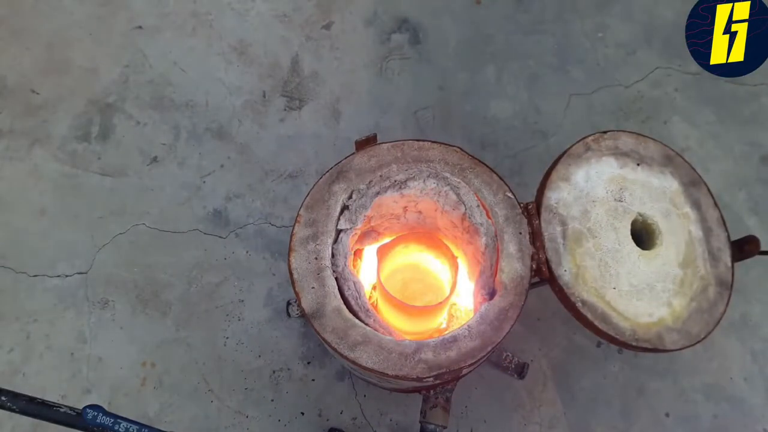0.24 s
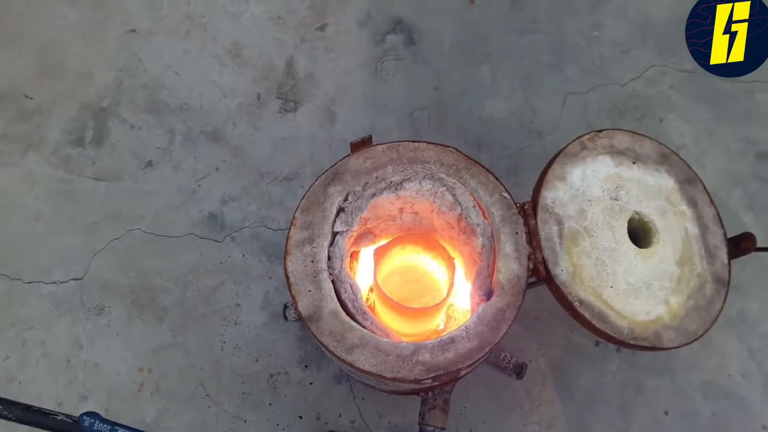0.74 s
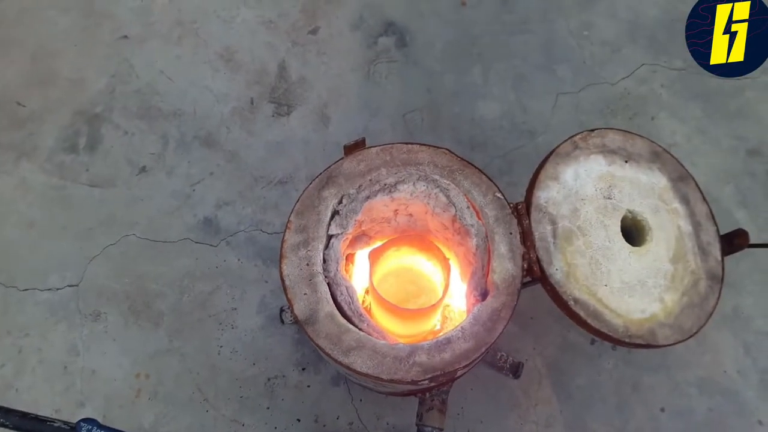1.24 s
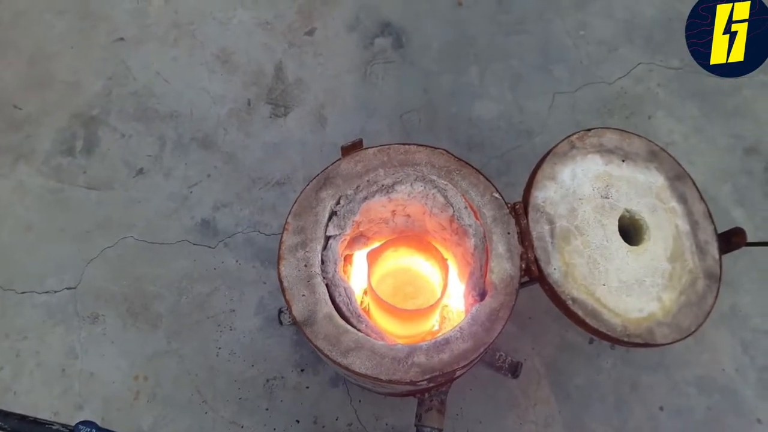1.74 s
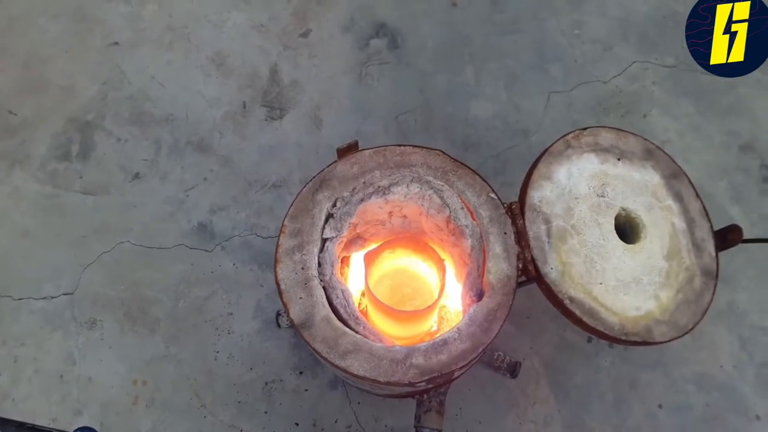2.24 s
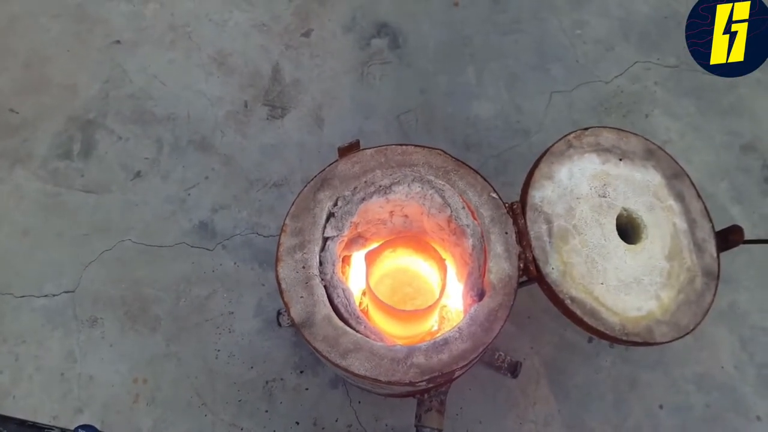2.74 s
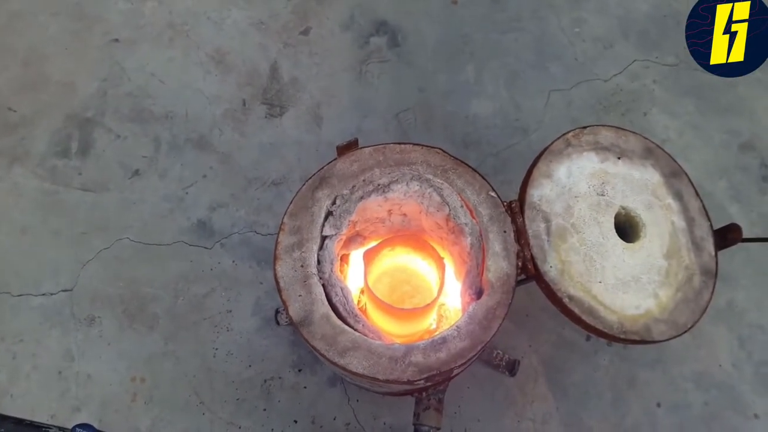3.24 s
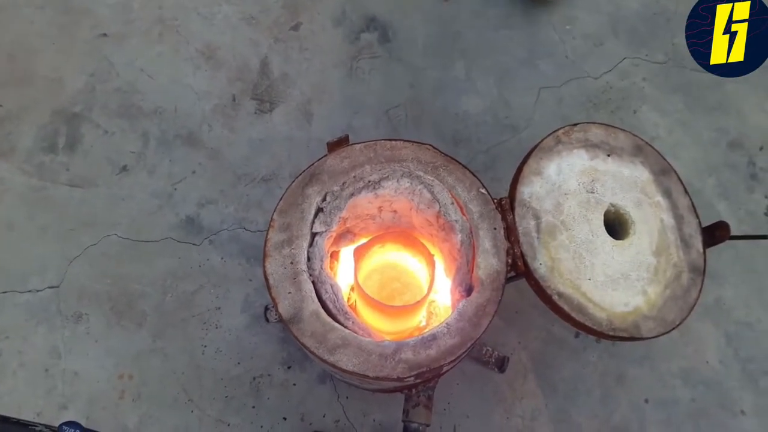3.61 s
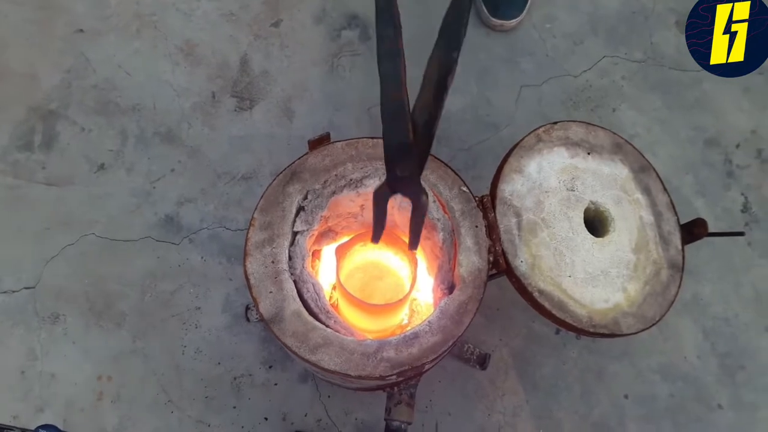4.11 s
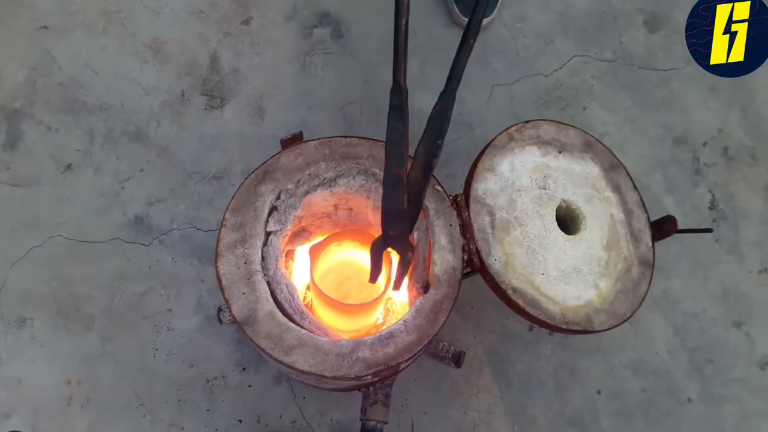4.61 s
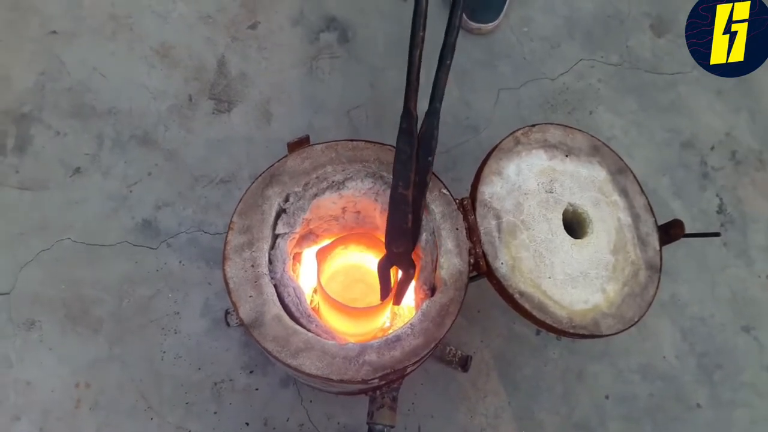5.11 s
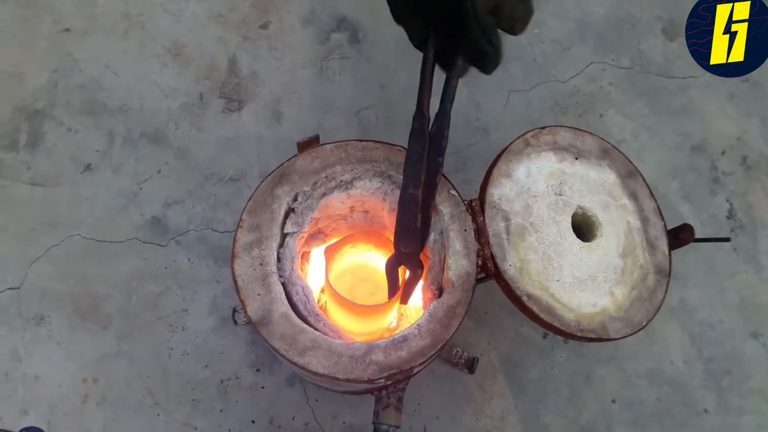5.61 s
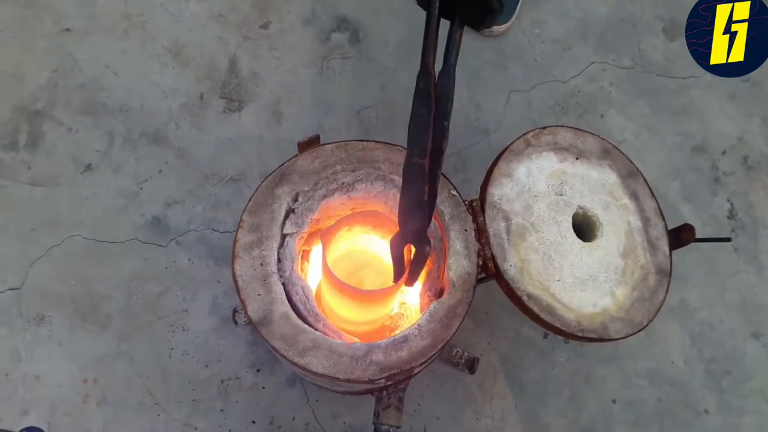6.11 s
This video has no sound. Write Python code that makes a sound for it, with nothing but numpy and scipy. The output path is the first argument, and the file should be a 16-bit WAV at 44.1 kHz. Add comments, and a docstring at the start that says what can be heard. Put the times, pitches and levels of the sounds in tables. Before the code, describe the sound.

A small open furnace burns at full heat on a workshop floor. Its hollow, throaty roar fills the whole stretch, fluttering rapidly with short surges and dips. A weaker, higher resonance wavers above it, with soft low rumbling puffs below. Behind it are a steady blower hum, faint whine and airy hiss. One microphone above, with slight short room reflections.

```python
"""A turbulent flame roars throughout, in the two lowest resonances of a small open furnace, over a rumble.
The furnace burns at full heat on a workshop floor, heard from above at one microphone.
Roar and rumble are shaped noise that flutters in level; the upper resonance also drifts in pitch.
Behind them the blower hums and whines in thin tones, and its draught hisses as patchy noise
with reflections of the workshop; a few faint, brief whistles glide upward."""
import sys
import numpy as np
from scipy import signal
from scipy.fft import rfft, irfft
from scipy.io import wavfile
from scipy.ndimage import uniform_filter1d

SR = 44100
rng = np.random.default_rng(int(sys.argv[2]) if len(sys.argv) > 2 else 0)


def transcribe(signal):
    """Save signal, clipped to [-1, 1], as a 16-bit WAV file at the path in sys.argv[1]."""
    frames = np.atleast_2d(signal).T
    limited = np.clip(frames, -1, 1)
    pcm = np.round(limited * 32767).astype(np.int16)
    wavfile.write(sys.argv[1], SR, pcm)


N = 280079
T = np.arange(N) / SR  # seconds
HZ = np.fft.rfftfreq(N, 1 / SR)

# Spectra give relative density only; each noise is later scaled to its own level.
# spectrum of the rush in the inlet pipe: pitch_hz, density_db [Hz, dB per Hz]
RUSH_SPECTRUM = [(600, -32), (1200, 0), (1480, -1.5), (1750, 0.5), (2100, 0), (2430, -2), (2790, 0),
                 (3150, -5), (3700, -4), (5000, -55)]
# spectrum of the hiss at the furnace mouth: pitch_hz, density_db [Hz, dB per Hz]
HISS_SPECTRUM = [(2000, -31), (3000, -37), (3550, -7), (4000, 2), (4600, 3), (5200, 0.5), (5700, 4),
                 (6400, 5), (7100, 3), (7500, -1.5), (7850, -11.5), (9000, -45)]
# spectrum of the higher fizz at the furnace mouth: pitch_hz, density_db [Hz, dB per Hz]
FIZZ_SPECTRUM = [(5000, -30), (8000, -6), (8700, -2), (9400, 0), (10500, -1), (11700, 1.5), (12500, 0),
                 (13100, 0), (14000, -1.5), (15500, -1)]
# strength of the rush before flicker and reflections: time_s, level_db [s, dB]
RUSH_LEVEL = [(0, -55), (.13, -63), (.3, -53.5), (.7, -57), (1.2, -54.5), (2.3, -56), (2.6, -58),
              (3, -54.5), (4.55, -57.5), (5.25, -56.5), (5.8, -58.5), (6.35, -57.5)]
# strength of the hiss before flicker and reflections: time_s, level_db [s, dB]
HISS_LEVEL = [(0, -58), (.2, -59), (.32, -56.5), (.45, -59), (1.2, -57.5), (2.25, -57), (2.55, -58.5),
              (2.9, -55.5), (3.45, -57), (4.4, -56.5), (4.57, -61.5), (4.76, -55.5), (5.48, -58.5),
              (5.7, -57), (6.22, -59.5), (6.35, -58)]
# brief whistles in the draught: middle_s, pitch_hz, peak_level_db, half_length_s [s, Hz, dB, s]
WHISTLES = [(0.316, 6600, -57.5, 0.049), (.29, 3200, -61, .1), (.3, 4100, -61, .07),
            (0.335, 1970, -57, 0.21), (1.353, 3590, -59.5, 0.17), (1.894, 7300, -63, 0.082),
            (2.303, 1780, -54, 0.082), (2.729, 4840, -57, .12), (4.219, 3580, -59, 0.11),
            (4.9, 1906, -56.5, 0.18)]
# a rough hiss that climbs: time_s, pitch_hz, level_db [s, Hz, dB]
CLIMB = [(0, 2740, -58), (.11, 2820, -52.5), (.17, 3200, -57), (.3, 3840, -63), (.42, 4100, -75)]
# the blower's blade tone and its multiples: multiple, level_db [-, dB before the blower's swell]
BLADE_ORDERS = [(1, -43.5), (3, -60.5), (6, -74), (10, -67), (11, -73), (20, -81), (30, -96)]
# thin tones of motor and housing: pitch_hz, level_db [Hz, dB before the blower's swell]
WHINE_TONES = [(134, -70), (1039, -60), (1387, -84), (1441, -76), (2780, -68), (2798, -67.5), (3278, -78.5),
               (3817, -78), (4160, -69), (4758, -77), (4856, -80), (6659, -79), (6826, -78), (7091, -75.5)]
# slow swell of the blower: time_s, swell_db [s, dB; halved for the tones, doubled for the ring]
BLOWER_SWELL = [(0, 1), (2.3, 2), (3.2, -2.5), (4.3, -1.5), (5, -5), (6.35, -2)]
# spectrum of the flame's rumble: pitch_hz, density_db [Hz, dB per Hz]
RUMBLE_SPECTRUM = [(20, -29), (48, -28), (65, -14), (85, -8), (105, -2), (135, -0.5), (200, 4), (300, -7.5),
                   (700, -11), (2000, -54)]
# spectrum of the main chamber resonance: pitch_hz, density_db [Hz, dB per Hz]
ROAR_SPECTRUM = [(150, -58), (215, -35), (250, -25.5), (280, -17.5), (322, -15.5), (336, -5.5), (385, -3),
                 (428, 1), (505, -4.5), (570, -10.5), (640, -23.5), (740, -33.5), (900, -36), (1300, -59)]
# spectrum of the upper resonance: offset_hz from its moving centre, density_db [Hz, dB per Hz]
UPPER_SPECTRUM = [(-500, -4), (-320, -8), (-200, -1), (-100, 1), (6, 6), (61, 6.5), (182, -1.5),
                  (249, -7.5), (379, -26.5), (598, -56)]
# drift of the upper resonance: time_s, centre_hz, level_db [s, Hz, dB]
UPPER_DRIFT = [(0, 1002, -43.5), (.45, 1084, -45), (1.2, 1059, -44), (1.55, 975, -44.5), (1.75, 1027, -45),
               (2.63, 1056, -43), (2.74, 1028, -53), (2.87, 1020, -41), (3.35, 987, -45),
               (3.85, 1040, -39.5), (4.5, 1068, -46.5), (4.6, 1086, -46), (5.42, 1009, -44.5),
               (5.75, 1084, -41.5), (5.84, 985, -51.5), (6.02, 975, -42.5), (6.17, 855, -57),
               (6.35, 820, -40)]
# the flame flares up (+) or falters (-): middle_s, roar_change_db, length_s [s, dB, s at half height]
SURGES = [(.37, -3.5, 0.064), (.76, 2, 0.11), (1.11, 3.5, 0.039), (1.54, -1, 0.11), (1.68, 2, 0.048),
          (1.77, -4.5, 0.067), (2.27, 1.5, 0.14), (2.43, -4.5, 0.1), (2.7, 3.5, 0.16), (2.84, -5, 0.082),
          (2.99, 4, 0.057), (3.2, 5, 0.044), (3.37, -2.5, 0.15), (3.83, -4, 0.064), (3.98, 3.5, 0.08),
          (4.85, -3.5, 0.074), (5.45, 3, 0.13), (5.63, 2.5, .06), (5.94, -3.5, 0.12)]
# the upper resonance flares: middle_s, rise_db, length_s [s, dB, s at half height]
FLARES = [(.44, 5, 0.13), (.67, 4.5, 0.092), (1.18, 5, 0.11), (1.55, 6, .08), (2.38, 2.5, .12),
          (4.61, 5, 0.079), (5.24, 3.5, 0.17)]
# low puffs of the flame: middle_s, rumble_rise_db, length_s [s, dB, s at half height]
PUFFS = [(.65, 8.5, .14), (1.42, 7, .08), (1.53, 12.5, .1), (1.92, 9, 0.078), (2.08, 8, 0.11),
         (3.0, 11, 0.13), (3.57, 7, .08)]

BLADE_HZ = 267.95
EDGE_HZ = 15560  # upper limit of the recorder
ROAR_DB, RUMBLE_DB = -25.5, -59.5  # between the surges and puffs
# turbulent flutter of each part: rms depth (dB) and rate (Hz)
ROAR_FLUTTER_DB, ROAR_FLUTTER_HZ = 0.76, 11
UPPER_FLUTTER_DB, UPPER_FLUTTER_HZ = 1.5, 11.6
RUMBLE_FLUTTER_DB, RUMBLE_FLUTTER_HZ = 1.7, 9.1
UPPER_SWAY_HZ, UPPER_SWAY_RATE_HZ = 11, 4  # sway of the upper resonance about its centre
FIZZ_DB, FIZZ_FOLLOW = -7, 1.06  # mean level relative to the hiss, and how far it follows its swings
WHISTLE_RISE_HZ_PER_S = 1220
# chance whistles: range of pitch, peak level, half length
FAINT_LOW_HZ, FAINT_HIGH_HZ, FAINT_DB, FAINT_HALF_S = 3400, 7900, -66, .11


def gain_of(db):
    """Decibels to amplitude."""
    return 10 ** (np.asarray(db) / 20)


def evened(x):
    """Scales to an rms of 1."""
    return x / np.sqrt(np.mean(abs(x) ** 2) + 1e-20)


def curves(rows):
    """Each column of a timed table, sample by sample."""
    s, *columns = np.transpose(rows)
    return [np.interp(T, s, c) for c in columns]


def swells(rows):
    """Smooth bumps in dB, each of its length at half height."""
    total_db = 0
    for middle_s, db, length_s in rows:
        phase = np.clip((T - middle_s) / length_s, -1, 1)
        total_db = total_db + db * np.cos(np.pi / 2 * phase) ** 2
    return total_db


def noise(spectrum):
    """Noise of rms 1 with the given spectrum, interpolated over log frequency."""
    hz, db = np.transpose(spectrum)
    shape_db = np.interp(np.log(HZ + 1), np.log(hz), db, right=-90)
    return evened(irfft(rfft(rng.standard_normal(N)) * gain_of(shape_db), N))


def wander(rate_hz):
    """Smooth random motion of rms 1, at up to about the given rate."""
    return evened(irfft(rfft(rng.standard_normal(N)) * np.exp(-(HZ / rate_hz) ** 2), N))


def steadied(x, seconds):
    """Takes the slow swells out of a noise and keeps its fast flutter."""
    size = max(int(seconds * SR), 8)
    power = uniform_filter1d(uniform_filter1d(x ** 2, size), size)
    return x / np.sqrt(power + 1e-12)


def narrow(hz, width_hz):
    """A narrow band of noise round a fixed or moving pitch."""
    carrier = np.exp(2j * np.pi * np.cumsum(hz * np.ones(N)) / SR)
    return evened(((wander(width_hz) + 1j * wander(width_hz)) * carrier).real)


def eddies(x, patchy_db, patch_hz, patch_s):
    """Passing eddies lift and sink small patches of the spectrum."""
    hz, t, z = signal.stft(x, SR, nperseg=1024, noverlap=768)
    across = np.fft.fftfreq(len(hz), hz[1])[:, None]
    along = np.fft.fftfreq(len(t), t[1])
    smooth = np.exp(-(across * patch_hz) ** 2 - (along * patch_s) ** 2)
    patches = evened(np.fft.ifft2(np.fft.fft2(rng.standard_normal(z.shape)) * smooth).real)
    lifted = z * gain_of(patchy_db * patches)
    return evened(signal.istft(lifted, SR, nperseg=1024, noverlap=768)[1][:N])


def workshop(x, wet_db, t60):
    """Dense reflections off floor and walls, fading 60 dB in t60 seconds, ripple the spectrum."""
    t = T[:SR // 3]
    tail = rng.standard_normal(len(t)) * gain_of(-60 * t / t60) * (t > .004)
    reflections = irfft(rfft(x) * rfft(tail / np.linalg.norm(tail), N), N)
    return x + gain_of(wet_db) * reflections


def draught():
    """Forced air rushes through the inlet pipe and hisses out of the furnace mouth."""
    (rush_db,), (hiss_db,) = curves(RUSH_LEVEL), curves(HISS_LEVEL)
    mean_db = hiss_db.mean()
    fizz_db = FIZZ_DB + mean_db + FIZZ_FOLLOW * (hiss_db - mean_db)
    rush = gain_of(rush_db) * eddies(noise(RUSH_SPECTRUM), patchy_db=1.0, patch_hz=400, patch_s=0.042)
    hiss = gain_of(hiss_db) * eddies(noise(HISS_SPECTRUM), patchy_db=1.44, patch_hz=500, patch_s=0.076)
    fizz = gain_of(fizz_db) * eddies(noise(FIZZ_SPECTRUM), patchy_db=1.6, patch_hz=700, patch_s=0.1)
    flicker_db = 0.63 * wander(32) + .5 * wander(4.3)  # the whole jet flickers together
    return workshop(gain_of(flicker_db) * (rush + hiss + fizz), wet_db=-11.5, t60=0.17)


def whistles(width_hz=110, climb_width_hz=380, count=8):
    """Air briefly sings on a rising pitch, breathy because each whistle is a cluster of 24 lines."""
    out = np.zeros(N)
    faint = []
    for when, pitch in rng.random((count, 2)):
        hz = np.interp(pitch, (0, 1), (FAINT_LOW_HZ, FAINT_HIGH_HZ))
        faint.append((when * T[-1], hz, FAINT_DB, FAINT_HALF_S))
    for middle_s, hz, db, half_s in WHISTLES + faint:
        near = abs(T - middle_s) < half_s
        t = T[near] - middle_s
        lines_hz = hz + width_hz * rng.standard_normal((24, 1))
        turns = lines_hz * t + WHISTLE_RISE_HZ_PER_S * t ** 2 / 2 + rng.random((24, 1))
        breath = evened(np.cos(2 * np.pi * turns).sum(0))
        out[near] += gain_of(db) * breath * np.cos(np.pi / 2 * t / half_s) ** 4
    climb_hz, climb_db = curves(CLIMB)
    return out + gain_of(climb_db) * narrow(climb_hz, climb_width_hz)


def blower(drift_hz=0.14, waver=0.22, waver_hz=7, whine_width_hz=5,
           housing_hz=2730, housing_width_hz=170, housing_db=-67):
    """A near-steady blade tone wavers in level, under thin motor tones and the ring of the housing."""
    turns = np.cumsum(BLADE_HZ + drift_hz * wander(4.0)) / SR
    hum = np.zeros(N)
    for multiple, db in BLADE_ORDERS:
        level = gain_of(db) * np.sqrt(2) * (1 + waver * wander(waver_hz))
        hum += level * np.sin(2 * np.pi * (round(multiple) * turns + rng.random()))
    # all thin tones share one shimmer, each shifted in time
    shimmer = wander(whine_width_hz) + 1j * wander(whine_width_hz)
    whine = np.zeros(N)
    for hz, db in WHINE_TONES:
        shifted = np.roll(shimmer, rng.integers(N))
        whine += gain_of(db) * (shifted * np.exp(2j * np.pi * hz * T)).real
    housing = gain_of(housing_db) * narrow(housing_hz, housing_width_hz)
    swell_db, = curves(BLOWER_SWELL)
    return gain_of(swell_db / 2) * (hum + whine) + gain_of(2 * swell_db) * housing


def upper_resonance(centre_hz):
    """Turbulence in the chamber's second resonance, carried along as its centre drifts."""
    offset_hz, db = np.transpose(UPPER_SPECTRUM)
    shape_db = np.interp(np.fft.fftfreq(N, 1 / SR), offset_hz, db, left=-100, right=-100)
    band = np.fft.ifft(np.fft.fft(rng.standard_normal(N)) * gain_of(shape_db))
    return (band * np.exp(2j * np.pi * np.cumsum(centre_hz) / SR)).real


def flame():
    """Combustion noise fills the chamber's resonances, always fluttering, with surges and puffs."""
    centre_hz, drift_db = curves(UPPER_DRIFT)
    centre_hz = centre_hz + UPPER_SWAY_HZ * wander(UPPER_SWAY_RATE_HZ)
    roar_db = ROAR_DB + swells(SURGES) + ROAR_FLUTTER_DB * wander(ROAR_FLUTTER_HZ)
    upper_db = drift_db + swells(FLARES) + UPPER_FLUTTER_DB * wander(UPPER_FLUTTER_HZ)
    rumble_db = RUMBLE_DB + swells(PUFFS) + RUMBLE_FLUTTER_DB * wander(RUMBLE_FLUTTER_HZ)
    roar = eddies(noise(ROAR_SPECTRUM), patchy_db=2.0, patch_hz=119, patch_s=0.067)
    roar = steadied(roar, seconds=0.085)
    upper = eddies(upper_resonance(centre_hz), patchy_db=3.5, patch_hz=240, patch_s=0.075)
    upper = steadied(upper, seconds=0.05)
    rumble = steadied(noise(RUMBLE_SPECTRUM), seconds=.12)
    return gain_of(roar_db) * roar + gain_of(upper_db) * upper + gain_of(rumble_db) * rumble


def scene():
    """Draught, whistles, blower and flame together at one microphone."""
    return (draught() + whistles() + blower() + flame())[None]


def record(dry):
    """The recorder's band limit, a steep low-pass."""
    low_pass = signal.firwin(1023, EDGE_HZ, window=("kaiser", 9), fs=SR)
    return signal.oaconvolve(dry, low_pass[None], "same")


dry = scene()
out = record(dry)
transcribe(out)
```